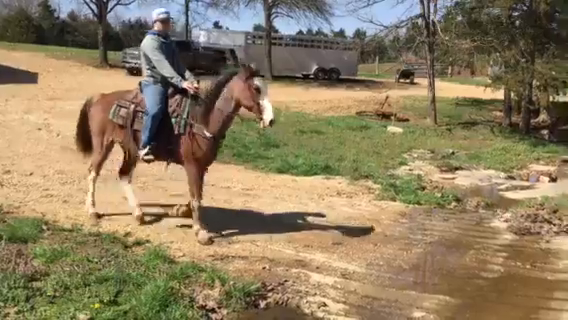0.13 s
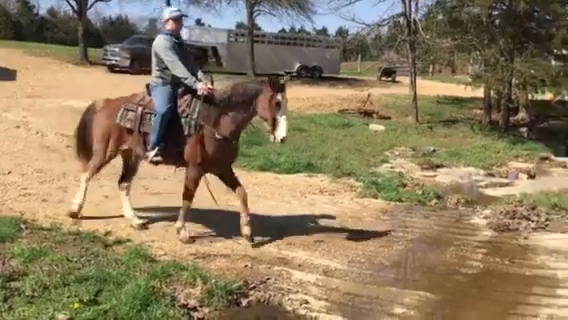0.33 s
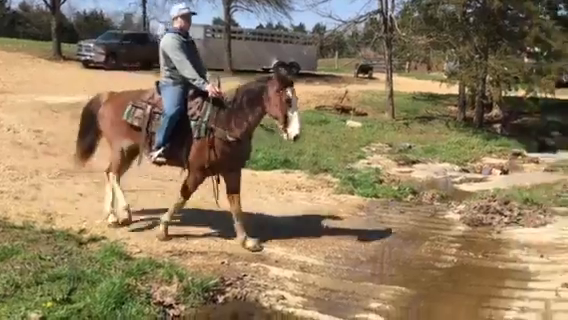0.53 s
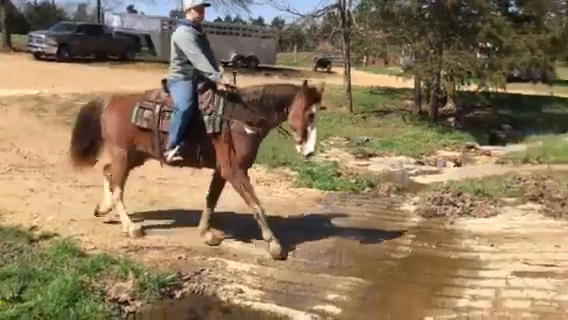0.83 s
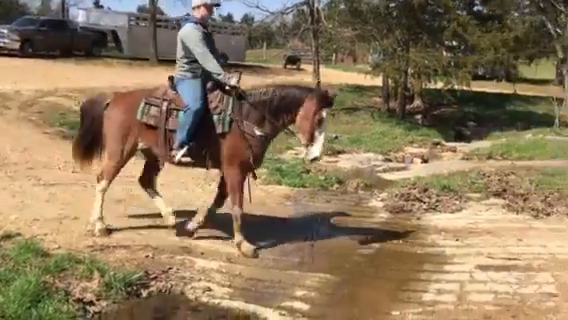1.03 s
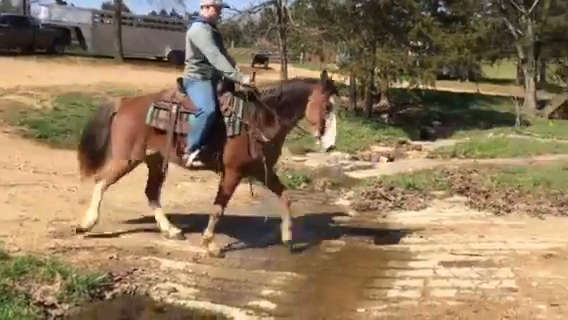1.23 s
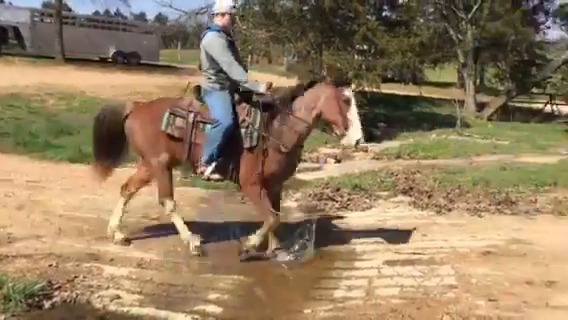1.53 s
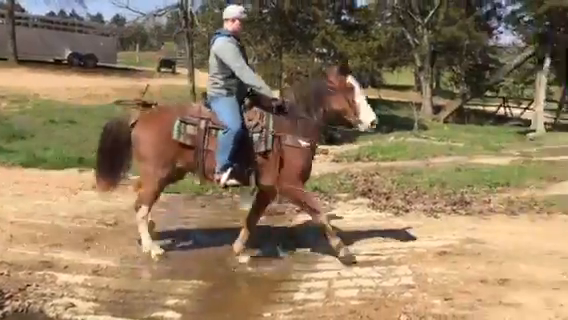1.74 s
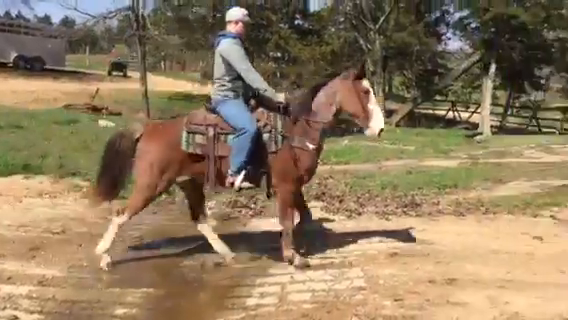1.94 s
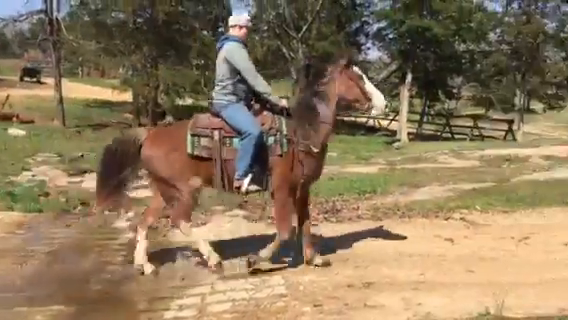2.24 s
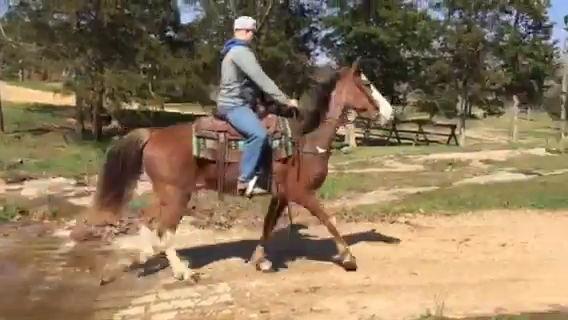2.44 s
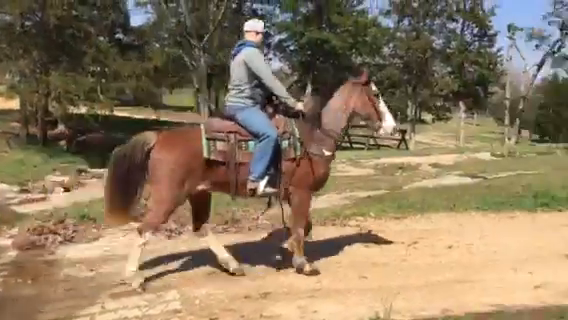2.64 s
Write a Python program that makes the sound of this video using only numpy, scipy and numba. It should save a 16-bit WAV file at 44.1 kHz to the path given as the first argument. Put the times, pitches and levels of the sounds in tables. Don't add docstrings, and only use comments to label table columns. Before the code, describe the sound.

A horse walks some metres from a phone microphone in open air: gritty scuffs and hoof knocks first, then louder, denser watery splashes, with a faint falling bird call and a low distant engine behind.

```python
import sys
import numpy as np
from scipy import signal
from scipy.fft import rfft, irfft
from scipy.io import wavfile
from scipy.ndimage import uniform_filter1d
from numba import njit

SR = 44100
rng = np.random.default_rng(int(sys.argv[2]) if len(sys.argv) > 2 else 0)


def transcribe(signal):
    frames = np.atleast_2d(signal).T
    limited = np.clip(frames, -1, 1)
    pcm = np.round(limited * 32767).astype(np.int16)
    wavfile.write(sys.argv[1], SR, pcm)


def boost(x):
    u = np.asarray(x, float) / 20
    return 10 ** u


N = 123480
T = np.arange(N) / SR

# (time [s], length [s], hiss level [dB], crunch level [dB])
SCUFFS = [(.082, 0.033, -68, -60.5), (.117, 0.044, -47, -52), (.152, 0.033, -47.5, -46.5),
          (.227, 0.034, -51.5, -50.5), (.259, 0.018, -53, -45.5), (.285, 0.042, -76, -56),
          (.372, 0.012, -49, -74), (.385, 0.1, -44, -42), (.451, 0.01, -48, -64), (.494, 0.019, -64, -65),
          (.543, 0.0053, -62, -61), (.628, .024, -59.5, -44.5), (.686, 0.051, -44, -48),
          (.772, .014, -55.5, -72), (.857, 0.018, -47, -46), (.873, 0.019, -42.5, -42.5),
          (.98, 0.0085, -55, -62), (1.045, 0.011, -56, -43), (1.115, 0.01, -60.5, -57)]
# (time [s], length [s], hiss level [dB], crunch level [dB])
SLAPS = [(1.294, 0.011, -58, -49), (1.318, 0.016, -44, -43), (1.332, 0.03, -41, -41.5),
         (1.375, 0.0086, -50, -46), (1.435, 0.019, -52.5, -50.5), (1.518, 0.018, -31.5, -35.5),
         (1.55, 0.038, -37, -39.5), (1.608, 0.0069, -39.5, -40), (1.723, 0.03, -48.5, -73),
         (1.736, 0.0099, -74, -41.5), (1.778, 0.028, -44.5, -42), (1.801, 0.013, -32, -34),
         (1.823, 0.058, -38, -32.5), (1.91, 0.022, -42.5, -37.5), (1.936, 0.049, -40, -34),
         (1.959, 0.036, -57, -35.5), (1.99, 0.014, -58, -33), (2.042, 0.015, -42, -43),
         (2.103, 0.046, -38.5, -30.5), (2.115, 0.0087, -33, -26.5), (2.163, 0.0032, -38, -69),
         (2.219, 0.0098, -40.5, -41.5), (2.322, 0.02, -37, -36.5), (2.341, 0.017, -37.5, -41),
         (2.359, 0.026, -38, -47), (2.374, 0.009, -28.5, -52), (2.443, 0.016, -45.5, -56),
         (2.478, 0.02, -41.5, -38), (2.499, .05, -67, -41), (2.659, 0.013, -35.5, -42.5),
         (2.691, 0.036, -39, -42), (2.776, .008, -52.5, -52)]
# (time [s], peak level [dB], pitch [Hz])
KNOCKS = [(0.151, -29, 80.2), (0.261, -43, 190), (0.6148, -26.5, 830), (0.6308, -23, 830),
          (.633, -27.5, 245.5), (.879, -30.5, 800), (1.036, -26, 1030), (1.046, -25, 1130),
          (1.326, -30, 697), (1.609, -31.5, 750), (1.806, -23, 361), (1.942, -24.5, 620),
          (1.959, -20.5, 760), (2.118, -22.5, 870), (2.12, -23, 290), (1.739, -37, 330), (2.326, -36, 276),
          (2.665, -35, 155), (2.221, -30, 332), (2.482, -38.5, 506)]
# (frequency [Hz], level [dB])
HISS_TONE = [(1470, -8.5), (2500, -2), (3260, -10), (3770, -6.5), (4880, -8.5), (6150, -0.5), (8080, -10.5),
             (13800, -9.5), (16000, -13)]
# (time [s], peak level [dB], pitch [Hz])
TICKS = [(0.0883, -49, 5970), (0.172, -33, 9500), (0.2317, -29.5, 6000), (0.3107, -51, 5820),
         (0.4519, -31.5, 6950), (0.4958, -40.5, 6290), (0.5449, -43, 3860), (0.6873, -43, 4704),
         (0.774, -41, 6640), (0.8634, -38.5, 3820), (0.8766, -36.5, 6500), (0.9421, -48, 6330),
         (1.0075, -49, 9300), (1.0477, -44, 4390), (1.5205, -25, 5500), (1.525, -22.5, 4500),
         (1.6101, -28, 5260), (1.7235, -44, 3700), (1.8037, -28, 3760), (1.8518, -34, 3400),
         (1.9277, -29, 6500), (1.9455, -29, 6740), (1.958, -24.5, 3790), (2.0504, -35, 6250),
         (2.106, -29, 5340), (2.1174, -26.5, 5280), (2.165, -35, 3670), (2.2154, -33, 5260),
         (2.2663, -38, 6350), (2.2972, -38, 3620), (2.3267, -32, 5340), (2.3354, -29, 3820),
         (2.3486, -31, 4450), (2.3745, -24, 6120), (2.481, -34, 6520), (2.5204, -37, 5700),
         (2.5413, -42, 5900), (2.5943, -35.5, 6620), (2.6302, -36.5, 6030), (2.6596, -34, 5340),
         (2.6974, -26, 3830), (2.7427, -35.5, 9900), (2.7766, -38.5, 5180)]
# (time [s], peak level [dB], pitch [Hz])
POPS = [(0.374, -37, 3740), (0.697, -38.5, 1150), (0.709, -33, 1680), (1.296, -35.5, 1760),
        (1.343, -31.5, 820), (1.373, -30.5, 1550), (1.443, -38, 1491), (1.491, -29.5, 1545),
        (1.521, -23.5, 1407), (1.554, -28, 1450), (1.589, -31, 3698), (1.664, -38, 1880),
        (1.747, -28.5, 910), (1.852, -23, 1190), (1.967, -28, 830), (2.0, -26, 1570), (2.196, -32, 2010),
        (2.251, -35, 3700), (2.335, -25, 2230), (2.63, -40.5, 1226), (0.27, -50, 1030), (.296, -49, 1020),
        (.704, -40.5, 850), (0.824, -52.5, 1210), (1.835, -28.5, 945), (2.112, -25, 1810),
        (2.119, -24, 2600), (2.128, -22, 1880), (2.162, -36, 1700), (2.296, -38, 1845), (2.446, -35, 2070),
        (2.514, -28.5, 1600), (2.524, -32.5, 2180), (2.541, -31.5, 1920), (2.553, -42.5, 700),
        (2.643, -43, 603), (2.662, -39, 2740), (2.712, -35.5, 1390), (2.699, -33.5, 2060),
        (2.76, -38, 1320)]
# (time [s], level [dB])
CHURN = [(1.28, -69), (1.45, -62), (1.62, -61), (1.88, -52.5), (2.03, -45), (2.09, -47.5), (2.24, -51),
         (2.4, -46.5), (2.53, -46), (2.6, -50.5), (2.74, -49.5), (2.8, -68)]
# (time [s], level [dB])
BIRD_CALLS = [
    (.06, -66),
    (.275, -70),
    (.485, -63),
    (.668, -59),
    (.857, -59),
    (1.057, -59),
    (1.248, -58.5),
    (1.445, -66),
]
# (delay [s], level [dB])
BIRD_ECHOES = [
    (.09, -9),
    (.15, -13),
]
# (time [s], pitch [Hz])
BIRD_PITCH = [(0, 2530), (.055, 2520), (.07, 2300), (.085, 1880), (.1, 1930), (.14, 1980)]
# (time [s], level [dB])
BIRD_SHAPE = [(0, -12), (.008, -2), (.06, 0), (.088, -15), (.097, -24), (.11, -5), (.14, -12)]
# (time [s], rate [Hz])
IDLE_RATE = [(0, 114.7), (1.75, 114.5), (1.95, 111.6), (2.8, 110.4)]
# (multiple of firing rate [1], level [dB])
IDLE_LINES = [(0.569, -60), (1, -48.5), (1.189, -64.5), (1.619, -74), (2.0, -57), (3.0, -69.5)]
# (time [s], level [dB])
IDLE_FADE = [(0, -5), (.7, 0), (1.8, 1), (2.3, -7), (2.8, 1.5)]
# (frequency [Hz], level [dB per Hz])
AIR_TONE = [(15, -76), (25, -80), (49, 0), (117, -4), (161, -6.5), (229, -10), (394, -31.5), (1940, -35),
            (16000, -53)]

FLICKER_DB = 2.8
DROP_SPREAD_DB = 2.6


def unit(x):
    return x / np.sqrt(np.mean(x ** 2))


def curve(table, t):
    return np.interp(t, *np.array(table, float).T)


def colour(x, table):
    hz, db = np.array(table, float).T
    f = np.arange(N // 2 + 1) * SR / N + 1
    return irfft(rfft(x) * boost(np.interp(np.log(f), np.log(hz), db, left=-90)), N)


def walk(rate):
    k = int(SR / rate)
    steps = np.repeat(rng.standard_normal(N // k + 1), k)
    return 1.27 * uniform_filter1d(uniform_filter1d(steps, k), k)[:N]


@njit
def rings(at, hz, cycles, size, glide, swell, n):
    y = np.zeros(n)
    for k in range(len(at)):
        start = int(at[k] * SR)
        span, phase = cycles[k] * SR / hz[k], 0.
        for i in range(min(int(span), n - start)):
            phase += 2 * np.pi * hz[k] * (1 + glide[k] * i / span) / SR
            rise = 1 - np.exp(-(phase / swell) ** 2)
            y[start + i] += size[k] * np.sin(phase) * np.exp(-6.9 * i / span) * rise
    return y


def grains(env, hz, octaves, cycles, spread_db, glide, count):
    at = rng.uniform(0, N / SR, count)
    pitch, length, sign = rng.standard_normal((count, 3)).T
    f = np.clip(hz * 2 ** (octaves * pitch), 300, 15000)
    turns = cycles * 2 ** (0.67 * length)
    size = boost(spread_db * np.minimum(rng.exponential(1, count), 4)) * np.sign(sign)
    size *= np.minimum(f / hz, 1) ** .5
    size *= np.sqrt(28 * T[-1] / count / np.mean(size ** 2 * turns / f))
    return rings(at, f, turns, size * np.interp(at, T, env), glide + 0 * f, 2.24, N)


def bursts(rows, column):
    touch_db, fall_db, tail_s, tail_db = -7, -18.5, 0.029, -14.5
    top = .32 if column == 2 else .48
    power = np.zeros(N)
    for row in rows:
        start, length = row[0], row[1]
        first = int(start * SR)
        t = T[first:int((start + length + 8 * tail_s) * SR)]
        u = (t - start) / max(length, .002)
        body = np.where(u < top, touch_db * (1 - u / top), fall_db * ((u - top) / (1 - top)) ** 2)
        tail = boost(tail_db) * np.exp(-(u - 1) * length / tail_s)
        power[first:][:len(t)] += (boost(row[column]) * np.where(u < 1, boost(body), tail)) ** 2
    return np.sqrt(power)


def gritty_noise(bright_db):
    grit_db, smooth_db = 2.8, -2
    out = 0
    for hz in (2000, 4000, 8000, 14000):
        uneven = np.minimum(rng.exponential(1, N // 8 + 1), 3).repeat(8)[:N]
        clicks = rng.standard_normal(N) * boost(grit_db * uneven + FLICKER_DB * walk(160))
        out = out + colour(clicks, [(hz / 3, -18), (hz, 0), (hz * 3, -18)])
    toned = colour(out, [(900, 1.39)] + list(HISS_TONE))
    return boost(smooth_db) * unit(colour(toned, [(10, 0), (6000, 0.0054), (13000, bright_db)]))


def scuffs():
    crunch = grains(bursts(SCUFFS, 3), 1337, 0.536, 19.6, 2.64, -0.069, count=3500)
    return bursts(SCUFFS, 2) * gritty_noise(bright_db=11) + crunch


def slaps():
    slosh = grains(bursts(SLAPS, 3), 1550, 0.611, 22.6, 2.13, 0.14, count=3000)
    return bursts(SLAPS, 2) * gritty_noise(bright_db=0) + slosh


def knocks():
    at, db, hz = np.array(KNOCKS, float).T
    crack_db = -10 - 6 * (hz < 500)
    parts = [(hz, 0, 5.83), (205 + 0 * hz, -8, 4), (1400 + 0 * hz, crack_db, 13)]  # (Hz, dB, cycles)
    return -sum(rings(at, f, cycles + 0 * f, boost(db + gain + 9.5), -.2 + 0 * f, 4.53, N)
                for f, gain, cycles in parts)


def ticks():
    at, db, hz = np.array(TICKS, float).T
    parts = [(hz, 0), (9000 + hz / 2, -3), (hz / 1.54, -6)]  # (Hz, dB)
    single = sum(rings(at, f, 24 + 0 * f, boost(db + gain + 1), 0 * f, 4.5, N) for f, gain in parts)
    hiss = bursts([*SCUFFS, *SLAPS], 2) * boost(-4)
    return single + grains(hiss, 7500, .65, 60, DROP_SPREAD_DB, 0.032, count=5000)


def water():
    at, db, hz = np.array(POPS, float).T
    pops = rings(at, hz, 31 + 0 * hz, boost(db + 2.5), 0.061 + 0 * hz, 11., N)
    churn = boost(curve(CHURN, T)) * (T > 1.28)
    bubbles = grains(churn * boost(-1.5), 1943.3, 0.449, 33.4, 2.2, 0.42, count=1600)
    drops = grains(churn * boost(-7.5), 5720, 0.685, 19, DROP_SPREAD_DB, 0.1, count=1500)
    spray = churn * boost(-2.5 + FLICKER_DB * walk(39.5)) * gritty_noise(bright_db=1.1)
    return pops + bubbles + drops + spray


def bird():
    out = held = 0
    for start, db in BIRD_CALLS:
        t = T - start
        tone = np.sin(2 * np.pi * np.cumsum(curve(BIRD_PITCH, t)) / SR)
        call = boost(db + curve(BIRD_SHAPE, t)) * (t > 0) * (t < .14) * tone
        out = out + call
        held = held + call * np.clip((.055 - t) / .015, 0, 1)
    echoes = sum(boost(db) * np.roll(held, int(delay * SR)) for delay, db in BIRD_ECHOES)
    return boost(1.5 * walk(90)) * (out + echoes)


def engine():
    rate = curve(IDLE_RATE, T)
    out = 0
    for multiple, db in IDLE_LINES:
        fade = curve(IDLE_FADE, T) * (multiple < 1.1) - 3.2 * T * (multiple > 2.5)
        level = boost(db + 0.5 + fade + 4 * walk(17))
        hz = multiple * rate * (1 + .005 * walk(13.28))
        out = out + level * np.sin(2 * np.pi * np.cumsum(hz) / SR)
    return out


def air():
    return unit(colour(rng.standard_normal(N), AIR_TONE)) * boost(-50 + 1.4 * walk(6))


def scene():
    horse = scuffs() + slaps() + knocks() + ticks() + water()
    return (horse + bird() + engine() + air())[None]


def top_cut(x):
    return signal.sosfilt(signal.butter(12, 16850, fs=SR, output="sos"), x)


def record(dry):
    top = signal.ellip(10, .2, 60, 15750, fs=SR, output="sos")
    opening = np.clip((T - .0825) / 0.0023, 0, 1)
    return top_cut(signal.sosfilt(top, dry) * opening)


dry = scene()
out = record(dry)
transcribe(out)
```